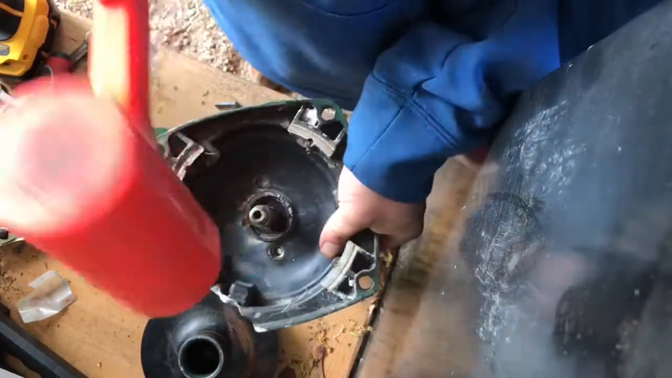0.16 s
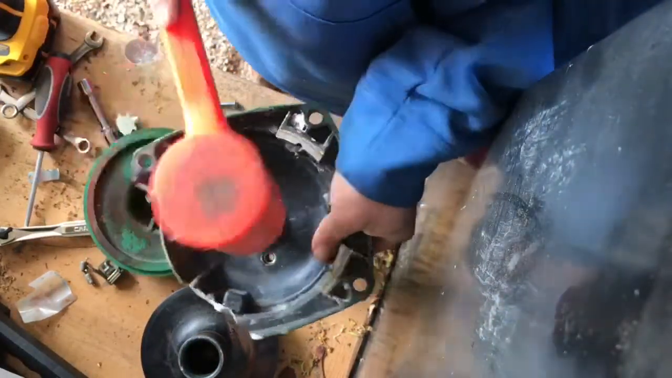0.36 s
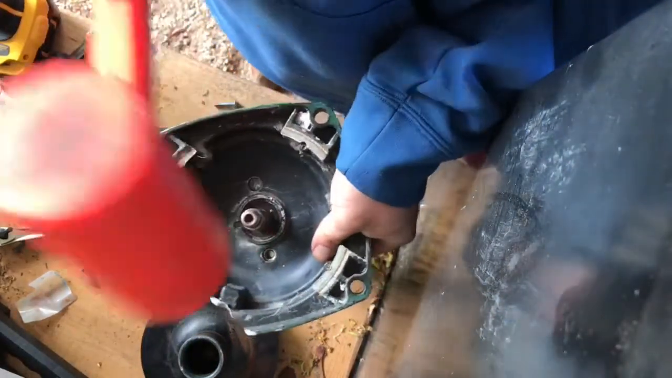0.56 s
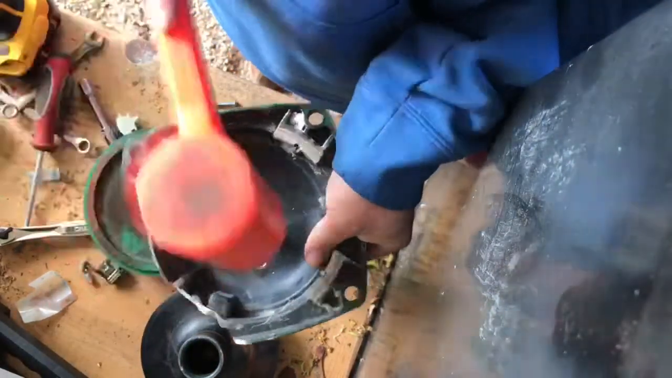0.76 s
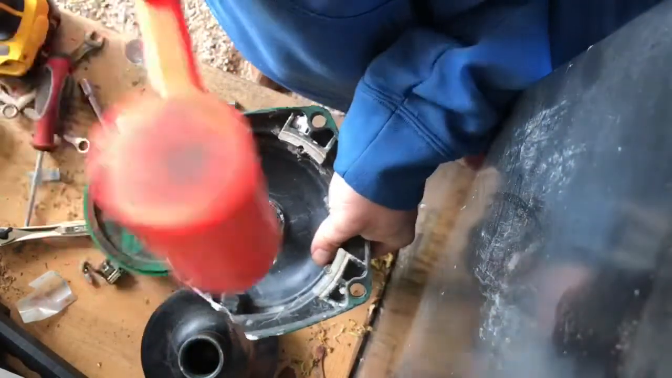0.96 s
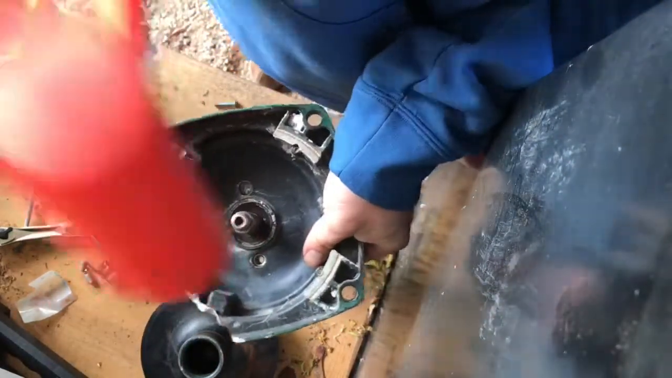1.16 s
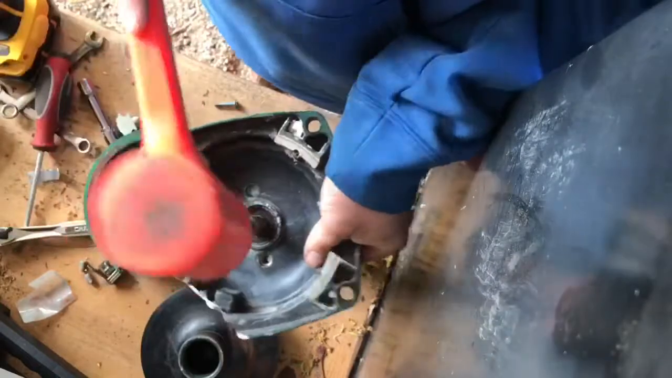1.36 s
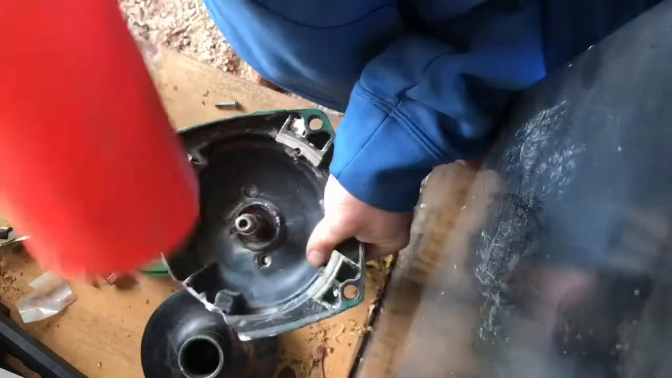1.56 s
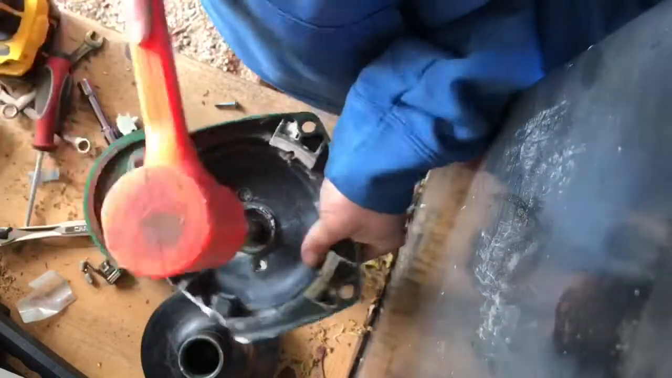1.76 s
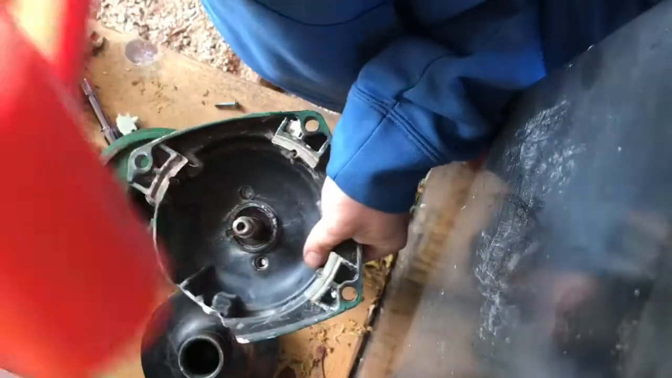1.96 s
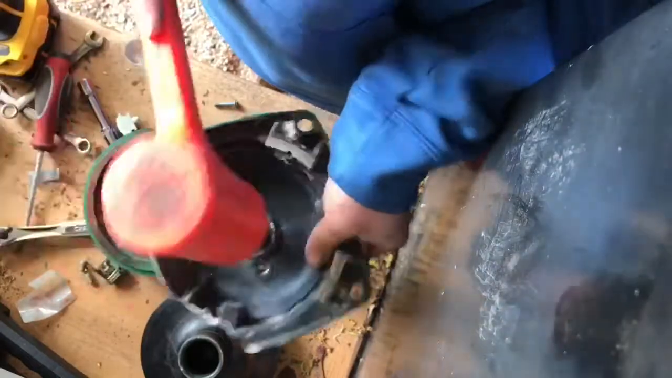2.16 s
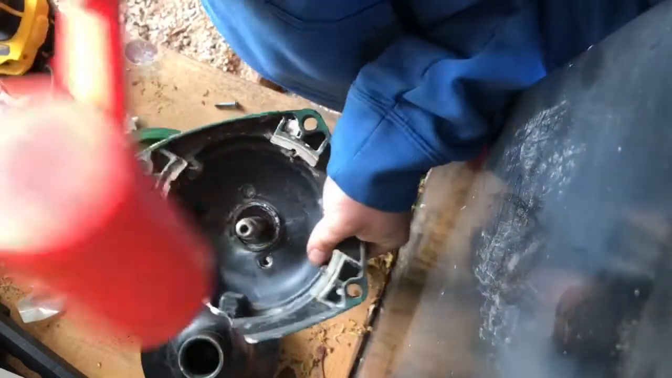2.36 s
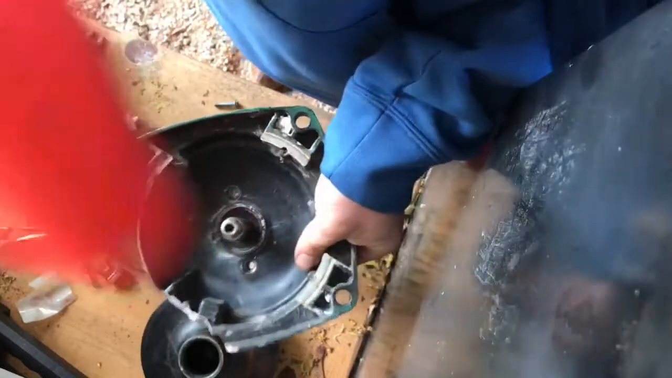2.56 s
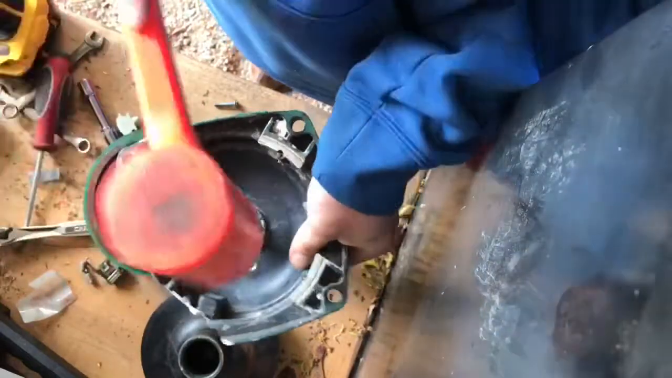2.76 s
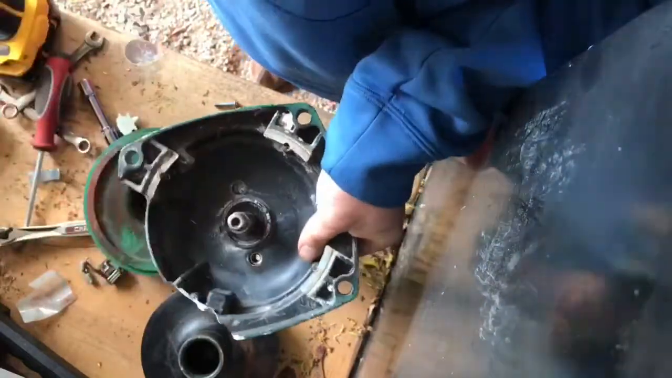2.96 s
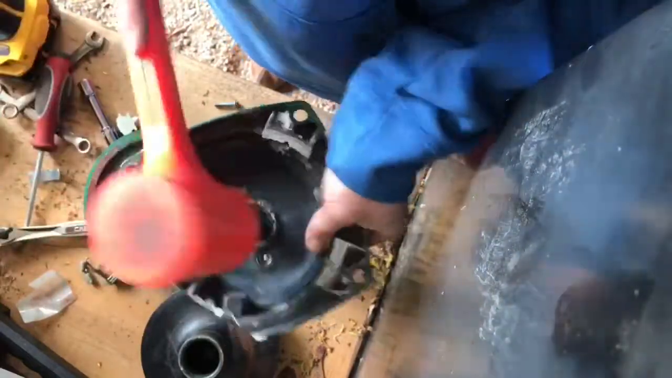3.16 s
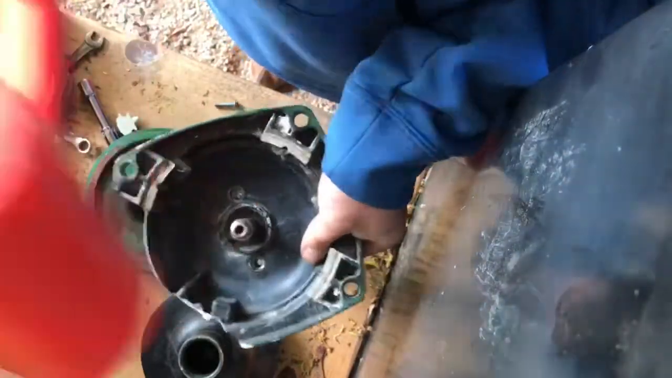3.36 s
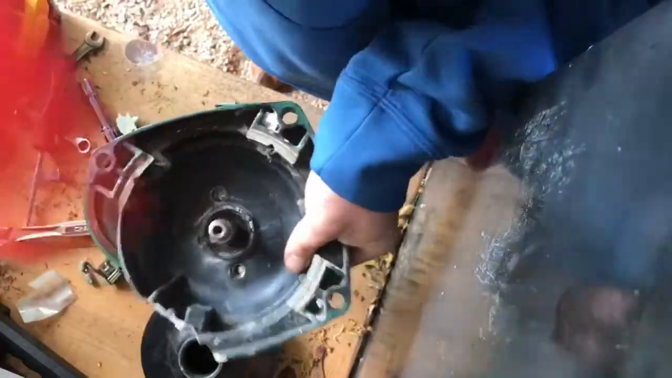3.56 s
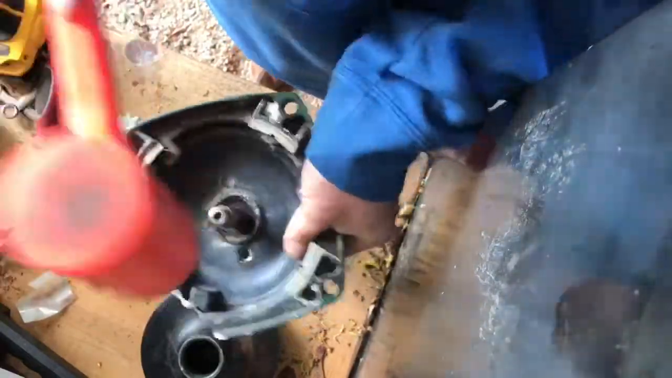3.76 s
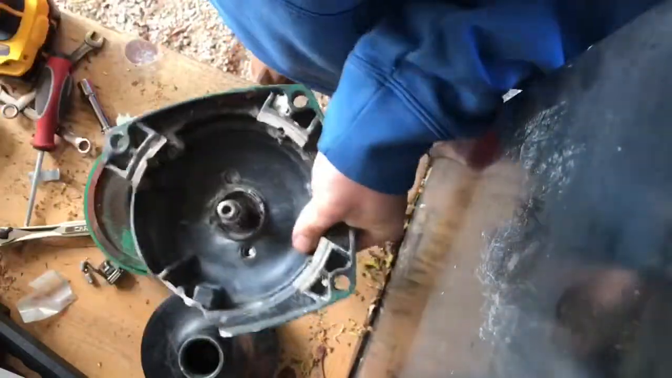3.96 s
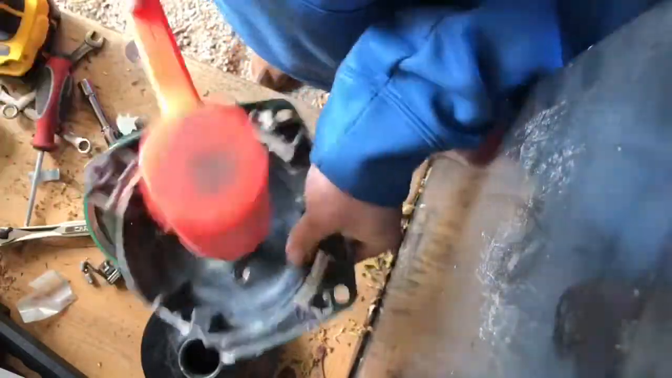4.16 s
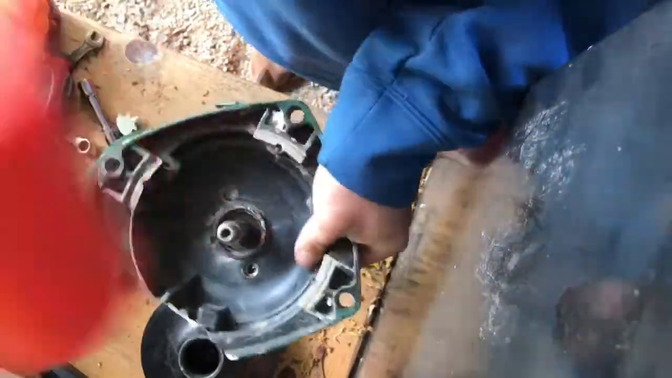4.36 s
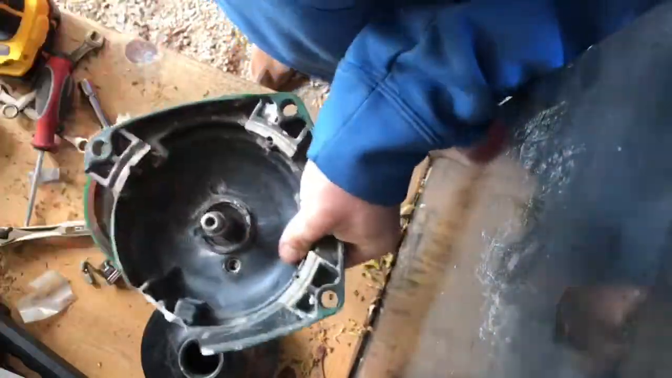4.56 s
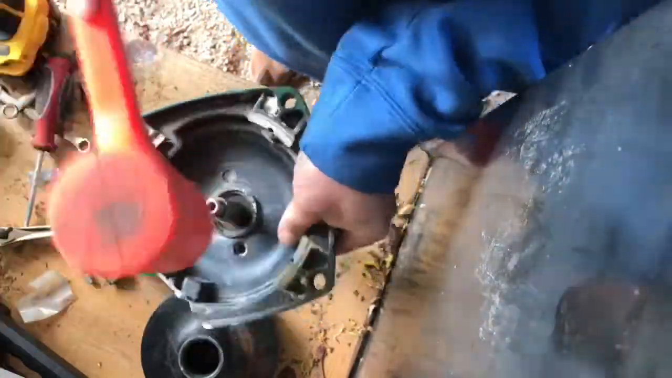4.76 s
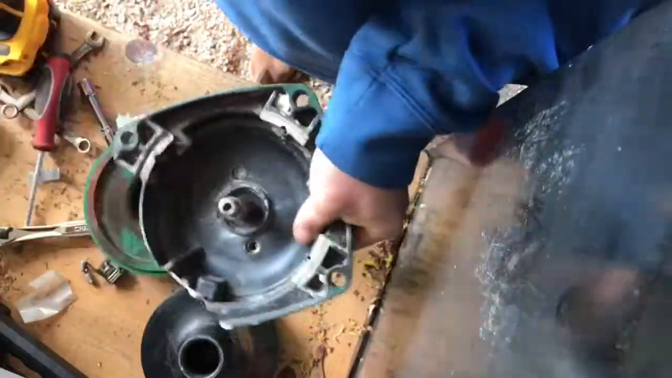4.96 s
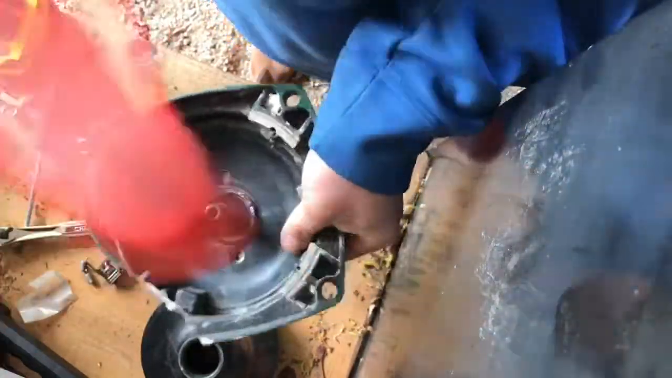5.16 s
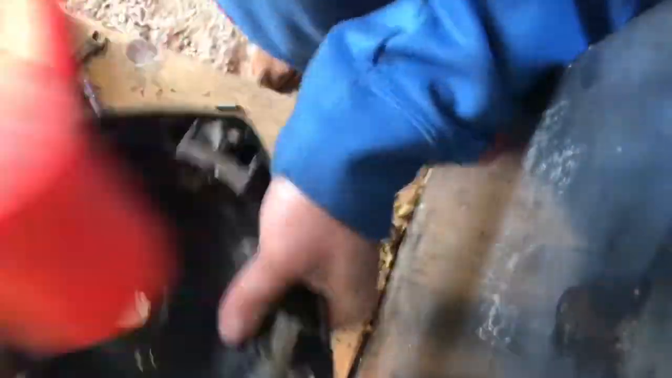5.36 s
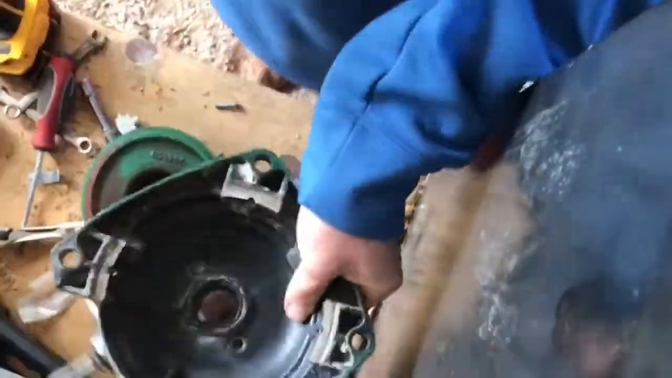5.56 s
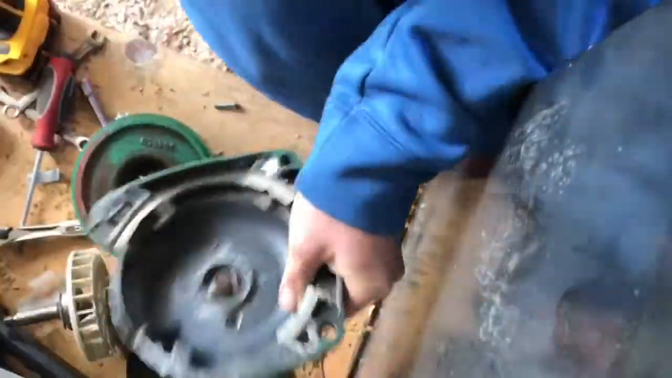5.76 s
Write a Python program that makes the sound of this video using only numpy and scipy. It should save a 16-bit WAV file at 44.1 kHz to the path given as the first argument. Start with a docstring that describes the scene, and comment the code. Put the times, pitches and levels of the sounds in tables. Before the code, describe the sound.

Outdoors at a wooden workbench, dry and close: even, blunt mallet knocks on hollow metal, each with a very short ring and a grainy crash inside the mallet head. Light metallic clinks bounce in the gaps. Just after five seconds the final knock runs into a tumble of low clunks, wooden thuds and high steel tinkles, then a second clatter with a short rough scrape, fading to faint outdoor air.

```python
"""Outdoors, at a wooden bench: a dead-blow mallet knocks eleven times on a cast motor housing.
The shot in its head swishes on each downswing and crashes just after the face lands.
Loose metal clinks between blows. The last blow frees the housing: it drops on the bench,
then clatters and scrapes as it is lifted. Impacts are sums of dying modes; swish, grit and scrape are shaped noise."""
import sys
import numpy as np
from scipy import signal
from scipy.fft import rfft, irfft
from scipy.io import wavfile
from scipy.ndimage import uniform_filter1d

SR = 44100
rng = np.random.default_rng(int(sys.argv[2]) if len(sys.argv) > 2 else 0)


def unload_wav(signal):
    """Save mono or channel-first audio to the path in sys.argv[1] as 16-bit WAV at rate SR, clipped to [-1, 1]."""
    wavfile.write(
        sys.argv[1],
        SR,
        np.round(np.clip(np.atleast_2d(signal).T, -1, 1) * 32767).astype(np.int16),
    )


N = 255512
T = np.arange(SR // 3) / SR  # seconds since a hit

# All table levels are relative, before the mix gains.
# mallet blows: start_s, force_db, wall_pitch_factor, rocking_db, swish_lead_s, swish_db,
# shot_delay_s, shot_push_db, push_pitch_hz, rebound_delay_s
BLOWS = [(.356, -1.5, 0.86, -15, 0.046, -25, 0.012, -28, 1110, 0.04),
         (0.7965, -0.5, 0.81, -17, 0.055, -24, 0.009, -8, 1146, 0.04),
         (1.2432, 1, 0.94, -19, 0.051, -23, .011, -24, 1035, .026),
         (1.709, 0.5, 0.95, -16, 0.06, -23, .009, -3, 1043, 0.033),
         (2.1714, 1, .96, -9, 0.069, -21.5, 0.0052, -14, 1010, 0.024),
         (2.649, 1, 0.88, -6.5, 0.072, -21.5, 0.0071, -10, 1104, .023),
         (3.1392, 0, 0.85, -3.5, .076, -21.5, .0085, -9, 1145, 0.025),
         (3.6464, -1, .92, -5, 0.075, -21.5, .01, -3, 1157, 0.022),
         (4.154, -0.5, 0.91, -7, 0.069, -23, 0.0075, -3.5, 1124, 0.022),
         (4.6708, 1.5, 0.91, -6, 0.074, -24.5, 0.0052, -8, 1110, 0.02),
         (5.2104, .5, 0.85, -16.5, 0.078, -25.5, 0.01, -8.5, 1170, 0.053)]
# struck wall of the housing: pitch_hz, level_db, t60_s
WALL_MODES = [(896, -9, 0.02), (1023, 1, 0.02), (1117.5, -11.5, 0.058), (1436, -23.5, 0.04)]
# base of the housing: pitch_hz, level_db, t60_s
BASE_MODES = [(304, -21, 0.017), (566.7, -11, .03), (636, 1, 0.021)]
# housing rocking on the boards: pitch_hz, level_db, t60_s
ROCKING_MODES = [(377, -3.5, 0.054), (447, 1.5, 0.04)]
# tick of the mallet face: pitch_hz, level_db
TICK_SPECTRUM = [(300, 3), (2000, -16), (4500, -0.5), (6000, -10), (8000, -0.5), (10500, -10), (13500, -19),
                 (16000, -13.5)]
# seam buzzing under load: pitch_hz, level_db
BUZZ_SPECTRUM = [(300, -15), (1400, 3.5), (1750, -4.5), (2200, 5), (3100, 5), (4200, -8.5), (6000, 0.5),
                 (9500, -12), (16000, -12.5)]
TICK_DB, BASE_DB, BUZZ_DB = -10, -2, -21.0  # buzz is relative to the force


def face_knock():
    """The face ticks, excites wall, base and rocking modes, and makes the seam buzz."""
    out = np.zeros(N)
    for start_s, force_db, pitch, rocking_db, *_ in BLOWS:
        knock = ring(WALL_MODES, rise_s=0.00073, pitch=pitch)
        knock += gain_of(BASE_DB) * ring(BASE_MODES, rise_s=0.00086)
        knock += gain_of(rocking_db) * ring(ROCKING_MODES, rise_s=0.0022)
        tick = burst(TICK_SPECTRUM, rise_s=0.0046, decay_s=.00033)
        buzz = burst(BUZZ_SPECTRUM, rise_s=0.0033, decay_s=0.0094)
        add(out, start_s, gain_of(TICK_DB) * tick)
        add(out, start_s + 0.00087, gain_of(force_db) * knock)
        add(out, start_s + .0007, gain_of(force_db + BUZZ_DB) * buzz)
    return out


# shot crashing inside the head: pitch_hz, level_db
CRASH_SPECTRUM = [(200, 18.5), (1700, -0.5), (3000, -6.5), (4200, 5), (5800, -10.5), (9500, 3), (12000, 0),
                  (16000, -6.5)]
# upper modes of the casting: pitch_hz, level_db, t60_s
CASTING_MODES = [(2198, 5, 0.049), (2980, 3.5, 0.058), (3285, 13.5, 0.024), (4103, 14.5, .022),
                 (5080, 1.5, .028), (5680, -6.5, 0.015)]
CRASH_DB, CASTING_DB = -12, -19.5
CASTING_DB_PER_PUSH_DB = .5  # a harder push rings the casting more


def shot_landing():
    """The shot lands inside the head, pushes the housing again and rings the casting."""
    out = np.zeros(N)
    for start_s, _, _, _, _, _, delay_s, push_db, push_hz, _ in BLOWS:
        landing_s = start_s + delay_s - .002  # first pellets lead the bulk
        push = ring([(push_hz, 0, .03)], rise_s=0.0014)
        crash = burst(CRASH_SPECTRUM, rise_s=0.0018, decay_s=0.0042)
        casting = ring(stirred(CASTING_MODES, spread_db=4.0, detune=0.0091), rise_s=0.0038)
        casting_db = CASTING_DB + CASTING_DB_PER_PUSH_DB * push_db
        add(out, landing_s, gain_of(push_db) * push)
        add(out, landing_s, gain_of(CRASH_DB) * crash)
        add(out, start_s + .004, gain_of(casting_db) * casting)
    return out


# tones of the freed casting: start_s, pitch_hz, level_db, t60_s
FREED_TONES = [(5.214, 2246, -8.5, 0.14), (5.243, 3930, -0.5, 0.041), (5.244, 6080, -6.5, 0.03),
               (5.284, 5930, -14, 0.065), (5.575, 3680, -26.5, 0.11), (5.638, 678, -8, 0.038),
               (5.66, 2030, 1.5, 0.02)]


def freed_casting():
    """Once free, the casting sings in single dying modes."""
    out = np.zeros(N)
    for start_s, pitch_hz, level_db, t60_s in FREED_TONES:
        add(out, start_s, ring([(pitch_hz, level_db, t60_s)], rise_s=0.0051))
    return out


# shot sliding along the hollow head: pitch_hz, level_db
SLIDE_SPECTRUM = [(800, -13), (1900, -6), (2250, 9.5), (2550, 0), (3800, -5), (4400, 9.5), (5600, -5),
                  (6600, 2.5), (7800, -4), (11800, -1.5), (15800, -10.5)]
# shot piling up: pitch_hz, level_db
HEAP_SPECTRUM = [(100, -14.5), (900, -10), (1950, -8.5), (2280, 4.5), (2650, -2.5), (3500, -4), (4400, 2),
                 (5600, -4), (7400, -4), (9000, 1.5), (10700, -1), (12500, 2), (15800, -6)]
USUAL_LEAD_S = 0.069  # the times below hold at this lead and stretch with it
SLIDE_DB, SLIDE_S, SLIDE_AHEAD_S = -18, 0.037, 0.023
HEAP_DB, HEAP_S, HEAP_SQUARENESS = -1.5, 0.014, 2.3  # squareness 2 is a bell curve


def shot_swish():
    """On the downswing shot slides to the back of the head and piles up; long swings slide longer, louder."""
    out = np.zeros(N)
    t = T - T.mean()  # time from the piling up
    for start_s, _, _, _, lead_s, swish_db, *_ in BLOWS:
        stretch = lead_s / USUAL_LEAD_S
        slide_shape = stretch ** 2 * np.exp(-((t / stretch + SLIDE_AHEAD_S) / SLIDE_S) ** 2)
        heap_shape = np.exp(-abs(t / stretch / HEAP_S) ** HEAP_SQUARENESS)
        slide = gain_of(SLIDE_DB) * slide_shape * grains(len(T), SLIDE_SPECTRUM, spread_db=3.5)
        heap = gain_of(HEAP_DB) * heap_shape * grains(len(T), HEAP_SPECTRUM, spread_db=1.5)
        clumps_db = 1.7 * evened(uniform_filter1d(rng.standard_normal(len(T)), size=110))
        add(out, start_s - lead_s + t[0], gain_of(swish_db + clumps_db) * (slide + heap))
    return out


# housing bumping on the boards: start_s, housing_db, pitch_factor, bench_db, grit_db
BUMPS = [(2.283, -29, 0.39, -26.5, -52), (3.162, -11.5, 0.48, -40, -34), (3.239, -18, 0.38, -17.5, -29),
         (3.251, -10.5, 0.34, -12.5, -36), (5.242, 1.5, 1.15, -18, -10), (5.256, -1.5, .87, -45, -29),
         (5.271, -2, 0.32, -32, -15.5), (5.278, -12, .43, 5, -11), (5.316, -13.5, 0.3, -25, -35),
         (5.41, -64, .67, -45, -66), (5.524, -23, 0.69, -40, -19.5), (5.534, -0.5, 0.66, -18.5, -9),
         (5.541, 4.5, 0.34, -21, -10), (5.574, -13, 1.1, -35, -28), (5.622, -30, .34, -16.5, -33),
         (5.635, -8.5, .66, -28, -14), (5.658, -8.5, 1.34, -40, -15.5), (5.664, -4, .21, -17, -42),
         (5.713, -19, 0.38, -18, -55), (5.773, -46, 1, -30, -32.5)]
# grit at the contact: pitch_hz, level_db
GRIT_SPECTRUM = [(150, 6.5), (1200, 5.5), (2200, -10), (3500, -4.5), (6000, -9), (10000, -18),
                 (16000, -17.5)]
# bench boards: pitch_hz, level_db, t60_s
BENCH_MODES = [(75, -25, 0.067), (104.4, -2, 0.098), (126, -13.5, 0.32), (182, -4, 0.036), (305, -9, 0.077)]
# bench frame: pitch_hz, level_db
RUMBLE_SPECTRUM = [(30, -26), (70, 4), (125, 12), (190, 3), (240, -26), (340, 0.5), (450, -22),
                   (900, -48.5), (4000, -70.5)]
REBOUND_DB, REBOUND_PITCH, REBOUND_BENCH_DB, REBOUND_GRIT_DB = -18.5, .44, -38.5, -28.5


def bumps():
    """The housing falls back on the boards, which thud, and the bench frame rumbles on."""
    metal, wood = np.zeros(N), np.zeros(N)
    rebounds = [(start_s + delay_s, REBOUND_DB, REBOUND_PITCH, REBOUND_BENCH_DB, REBOUND_GRIT_DB)
                for start_s, *_, delay_s in BLOWS]
    for start_s, housing_db, pitch, bench_db, grit_db in rebounds + BUMPS:
        clunk = ring(WALL_MODES, rise_s=0.0017, pitch=pitch)  # softer contacts sound lower
        clunk += gain_of(-8.5) * ring(BASE_MODES, rise_s=0.0006)
        clunk += gain_of(-18) * ring(ROCKING_MODES, rise_s=.001)
        grit = burst(GRIT_SPECTRUM, rise_s=0.00045, decay_s=0.0079)
        casting = ring(stirred(CASTING_MODES, spread_db=5.0, detune=0.033), rise_s=0.005)
        thud = ring(BENCH_MODES, rise_s=0.0026)
        rumble = burst(RUMBLE_SPECTRUM, rise_s=0.028, decay_s=0.063)
        add(metal, start_s, gain_of(housing_db + 2.0) * clunk)
        add(metal, start_s, gain_of(grit_db) * grit)
        add(metal, start_s, gain_of(grit_db - 17) * casting)
        add(wood, start_s, gain_of(bench_db) * thud)
        add(wood, start_s, gain_of(bench_db - 26) * rumble)
    for start_s, force_db, *_ in BLOWS:  # each blow also shoves the whole bench
        add(wood, start_s, gain_of(force_db - 25.5) * ring([(69, 0, 0.051)], rise_s=0.00071))
    return radiated(metal, cutoff_hz=171) + wood


# housing scraping the boards: pitch_hz, level_db
SCRAPE_SPECTRUM = [(40, -5.5), (150, 0), (420, 2), (800, -22), (1100, -4.5), (1700, -16), (2600, -16),
                   (3700, -23.5), (7700, -27), (12500, -28), (16000, -46.5)]
DRAG_START_S, DRAG_ATTACK_S, DRAG_HOLD_S = 5.55, .05, 0.054
DRAG_DB, DRAG_RELEASE_DB_PER_S = -28, 128


def drag():
    """Lifted at one side, the housing sticks and slips over the boards: grains of fluctuating level."""
    t = np.arange(N) / SR - DRAG_START_S
    slips_db = 4 * evened(uniform_filter1d(rng.standard_normal(N), size=300))
    release_db = -DRAG_RELEASE_DB_PER_S * np.maximum(t - DRAG_ATTACK_S - DRAG_HOLD_S, 0)
    pressure = np.clip(t / DRAG_ATTACK_S, 0, 1) * gain_of(DRAG_DB + release_db)
    return grains(N, SCRAPE_SPECTRUM, spread_db=5) * pressure * gain_of(np.minimum(slips_db, 5))


# louder clinks of a loose piece: start_s, ring_db, edge_db
CLINKS = [(0.0236, -23, -31), (.0663, -29, -44.5), (.4331, -17, -26.5), (0.4931, -23.5, -33.5),
          (0.8758, -21.5, -21.5), (1.313, -24, -32), (1.3275, -27, -33), (1.3498, -25, -28),
          (1.775, -16.5, -23.5), (1.809, -26.5, -35.5), (2.2314, -20.5, -36.5), (2.3621, -30.5, -40),
          (2.4251, -21.5, -28.5), (2.4698, -30.5, -41), (2.7459, -13, -24), (3.2106, -29, -31),
          (3.2436, -21.5, -29.5), (3.289, -26.5, -29.5), (3.3088, -25, -30.5), (3.352, -20.5, -25),
          (3.3844, -29, -37.5), (3.4856, -27, -28.5), (3.71, -24.5, -38.5), (3.7624, -22, -23.5),
          (3.792, -33, -38), (3.86, -30.5, -32), (3.889, -30, -34), (3.905, -23, -27), (4.203, -49, -19.5),
          (4.233, -24.5, -32), (4.2671, -34, -29), (4.2943, -29.5, -30.5), (4.7076, -38, -27.5),
          (4.7264, -23, -24), (4.7565, -23, -22), (4.7904, -28.5, -34.5), (5.3381, -31.5, -31.5)]
BOUNCE_S, BOUNCE_SCATTER = 0.014, 0.33  # median gap, log spread
BOUNCE_RING_DB, BOUNCE_EDGE_DB = -11, -13  # change per bounce
RATTLE_FROM_S, RATTLE_TO_S = 0.05, .22  # after each blow
RATTLE_RING_DB, RATTLE_EDGE_DB, RATTLE_DB_PER_S = -34, -46, -79


def clinks(count=3):
    """The loose piece bounces weaker and duller after each clink, and rattles faintly after each blow."""
    out = np.zeros(N)
    for start_s, ring_db, edge_db in CLINKS:
        gaps_s = BOUNCE_S * np.exp(BOUNCE_SCATTER * rng.standard_normal(count))
        for k, gap_s in enumerate(gaps_s):
            add(out, start_s, clink(ring_db + k * BOUNCE_RING_DB, edge_db + k * BOUNCE_EDGE_DB))
            start_s += gap_s
    for start_s, *_ in BLOWS:
        for after_s in rng.uniform(RATTLE_FROM_S, RATTLE_TO_S, count):
            fade_db = RATTLE_DB_PER_S * (after_s - RATTLE_FROM_S)
            add(out, start_s + after_s, gain_of(fade_db) * clink(RATTLE_RING_DB, RATTLE_EDGE_DB))
    return out


# low ring of the loose piece: pitch_hz, level_db, t60_s
LOOSE_MODES = [(1467.5, 4, 0.034), (1518, -8, 0.016), (1530, -17, .063), (1607, -7, 0.014)]
# its upper modes: pitch_hz, level_db, t60_s
LOOSE_EDGE_MODES = [(2790, 4.5, 0.028), (3032, 7, 0.037), (3050, -12, 0.011), (3920, 3.5, 0.035),
                    (4510, 0.5, 0.0245), (5220, 4.5, 0.025), (6700, 4, 0.014), (7340, -25, 0.06),
                    (8630, -4, 0.02), (9300, -9, 0.015)]
# its gritty contact: pitch_hz, level_db
CHATTER_SPECTRUM = [(300, -13.5), (1900, 2.5), (2900, 6.5), (5200, 1), (7000, 3), (8000, -12.5),
                    (9400, -6.5), (10500, -14.5), (13000, -5.5), (16000, -14)]


def clink(ring_db, edge_db):
    """One contact of the loose piece: short low and high modes with a gritty edge."""
    low = ring(stirred(LOOSE_MODES, spread_db=0.5, detune=0.008), rise_s=0.0028)
    high = ring(stirred(LOOSE_EDGE_MODES, spread_db=3, detune=0.015), rise_s=0.0015)
    chatter = burst(CHATTER_SPECTRUM, rise_s=0.001, decay_s=0.005)
    return gain_of(ring_db + 3) * low + gain_of(edge_db - 6.5) * high + gain_of(edge_db - 4.5) * chatter


# tinkles of a small steel part: start_s, body_db, top_db
TINKLES = [(3.254, -48.5, -26), (5.284, -36.5, -12), (5.546, -41, -12.5), (5.661, -37.5, -32),
           (5.717, -49, -37)]
# modes of the steel part: pitch_hz, level_db, t60_s
STEEL_MODES = [(6580, -12, 0.45), (9060, 10, 0.089), (9720, 5.5, 0.11), (11300, -3, 0.095),
               (11480, 7.5, 0.092), (14450, -2, 0.19)]
# its top tone: pitch_hz, level_db, t60_s
STEEL_TOP_MODES = [(13098, 0, .12), (13190, -10, .08)]
HOP_S, HOP_DB = 0.013, -6.5  # base gap, change per hop


def tinkles(count=3):
    """A small steel part is jolted, hops and rings very high."""
    out = np.zeros(N)
    for start_s, body_db, top_db in TINKLES:
        for k, gap_s in enumerate(HOP_S * rng.uniform(.5, 2, count)):
            body = ring(stirred(STEEL_MODES, spread_db=3.5, detune=0.0029), rise_s=0.00091)
            top = ring(stirred(STEEL_TOP_MODES, spread_db=1, detune=0.0021), rise_s=0.003)
            hop = gain_of(body_db - 3) * body + gain_of(top_db - 2.5) * top
            add(out, start_s, gain_of(k * HOP_DB) * hop)
            start_s += gap_s
    return out


# decay of the scatter: pitch_hz, t60_s
YARD_T60 = [(60, 0.38), (170, 0.28), (400, 0.3), (1000, 0.22), (3000, 0.25), (8000, 0.15), (16000, 0.16)]
# level of the scatter: pitch_hz, level_db
YARD_LEVEL = [(60, -36.5), (300, -10.5), (1000, -10.5), (1800, -16), (4000, -16), (9000, -15), (16000, -20)]


def yard(x):
    """Weak, short scatter from bench and nearby walls: convolution with noise decaying per band."""
    taps = rng.standard_normal(len(T)) * (1 - np.exp(-(T / 0.015) ** 2))
    hz, t, bands = signal.stft(taps, SR, nperseg=256)
    t60_s = read(YARD_T60, hz)[:, None]
    unit_energy = np.sqrt(2 * np.log(1000) / (t60_s * SR))
    decay_db = read(YARD_LEVEL, hz)[:, None] - 60 * t / t60_s
    tail = signal.istft(bands * unit_energy * gain_of(decay_db), SR, nperseg=256)[1]
    return signal.fftconvolve(x, tail)[:N]


# outdoor background: pitch_hz, level_db
AIR_SPECTRUM = [(25, -7), (50, 10.5), (130, -5), (300, -3.5), (700, -8), (920, -4.5), (1250, -10),
                (2200, -14.5), (2900, -12), (4400, -19), (8600, -22.5), (16000, -26.5)]
AIR_DB = -56.5


def air():
    """Faint outdoor background: steady coloured noise."""
    return gain_of(AIR_DB) * coloured(rng.standard_normal(N), AIR_SPECTRUM)


def ring(modes, rise_s, pitch=1):
    """Dying modes; the contact takes a moment to build up."""
    tones = sum(gain_of(level_db - 60 * T / t60_s) * np.sin(2 * np.pi * pitch_hz * pitch * T)
                for pitch_hz, level_db, t60_s in modes)
    return tones * (1 - np.exp(-(T / rise_s) ** 2))


def stirred(modes, spread_db, detune):
    """Each contact falls on another spot and wakes the modes differently."""
    chance = rng.standard_normal((len(modes), 2))
    return [(pitch_hz * (1 + detune * a), level_db + spread_db * b, t60_s)
            for (pitch_hz, level_db, t60_s), (a, b) in zip(modes, chance)]


def burst(spectrum, rise_s, decay_s):
    """A short spray of grains, its envelope peaking at one."""
    shape = (1 - np.exp(-(T / rise_s) ** 2)) * np.exp(-T / decay_s)
    return grains(len(T), spectrum, spread_db=2) * shape / shape.max()


def grains(size, spectrum, spread_db):
    """Dense tiny impacts of uneven strength."""
    strength_db = spread_db * np.minimum(rng.exponential(1, size), 4)
    return coloured(rng.standard_normal(size) * gain_of(strength_db), spectrum)


def coloured(x, spectrum):
    """Gives a noise a spectrum, at an rms of one."""
    hz = np.fft.rfftfreq(len(x), 1 / SR)
    return evened(irfft(rfft(x) * gain_of(read(spectrum, hz)), len(x)))


def radiated(x, cutoff_hz):
    """A small casting sends out little bass."""
    return signal.sosfilt(signal.butter(2, cutoff_hz, "high", fs=SR, output="sos"), x)


def gain_of(db):
    """Decibels to gain."""
    return 10 ** (np.asarray(db) / 20)


def evened(x):
    """Scales to an rms of one."""
    return x / np.sqrt(np.mean(x ** 2) + 1e-20)


def read(points, hz):
    """Interpolates a table on a log-frequency axis."""
    point_hz, value = np.transpose(points)
    return np.interp(np.log(hz + 1), np.log(point_hz + 1), value)


def add(mix, start_s, sound):
    """Mixes a sound in at start_s."""
    part = mix[max(round(start_s * SR), 0):][:len(sound)]
    part += sound[:len(part)]


def scene():
    """All the sources close to the microphone, plus scatter and background."""
    mallet = radiated(face_knock() + shot_landing() + freed_casting(), cutoff_hz=298)
    near = mallet + shot_swish() + bumps() + drag() + clinks() + tinkles()
    return (near + yard(near) + air())[None]


EDGE_HZ = 16050  # upper band limit


def record(dry):
    """The microphone loses the deepest bass and rounds off the hardest peaks; then the band limit."""
    thin = signal.sosfilt(signal.butter(2, 36, "high", fs=SR, output="sos"), dry)
    rounded = thin / (1 + (thin / .98) ** 6) ** (1 / 6)
    lowpass = signal.firwin(301, EDGE_HZ, window=("kaiser", 8), fs=SR)
    return signal.oaconvolve(rounded, lowpass[None], "same")


dry = scene()
out = record(dry)
unload_wav(out)
```